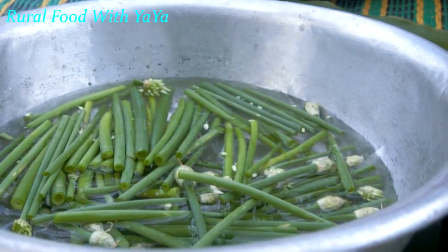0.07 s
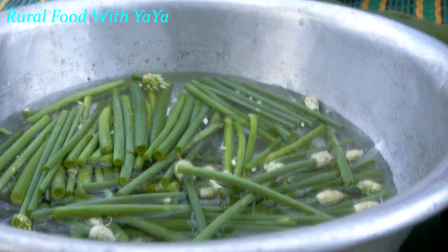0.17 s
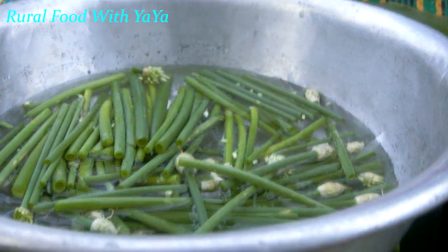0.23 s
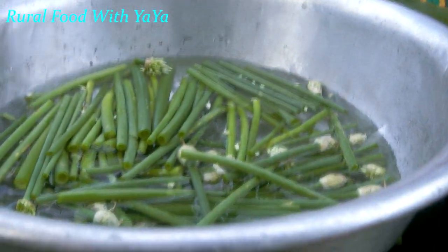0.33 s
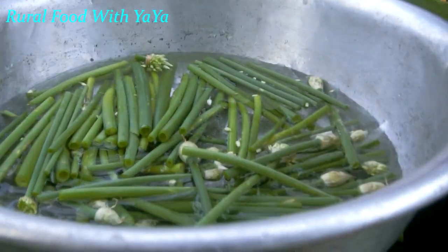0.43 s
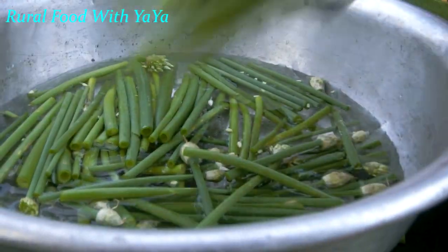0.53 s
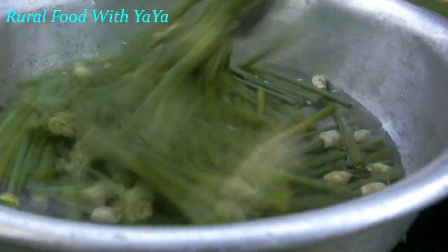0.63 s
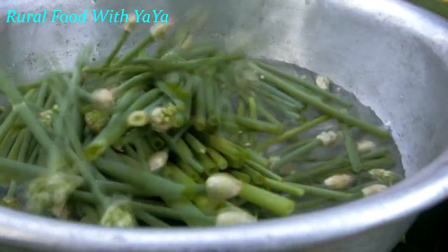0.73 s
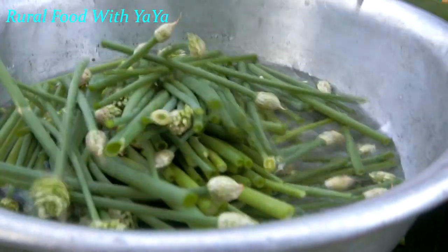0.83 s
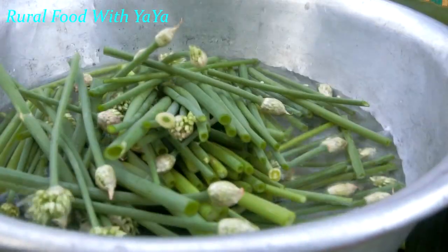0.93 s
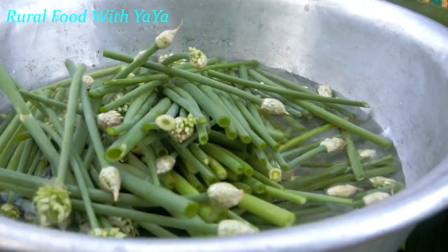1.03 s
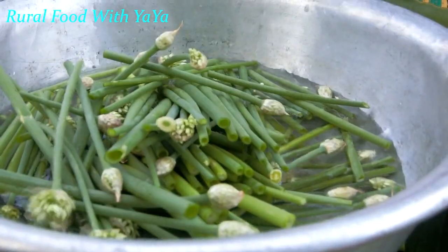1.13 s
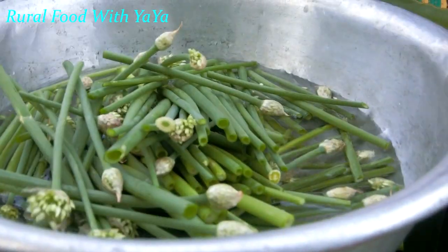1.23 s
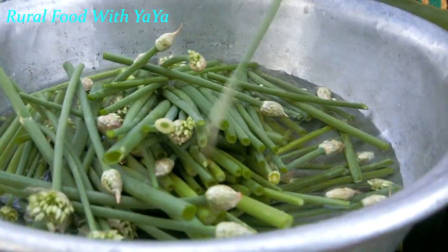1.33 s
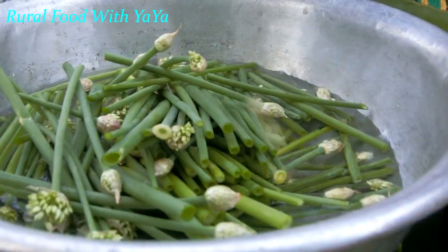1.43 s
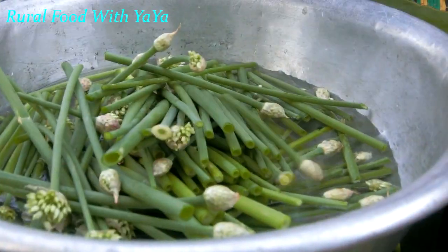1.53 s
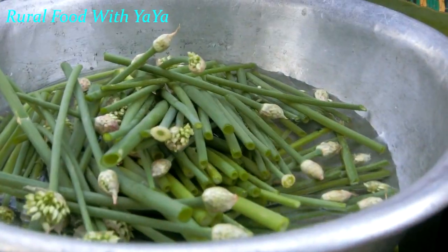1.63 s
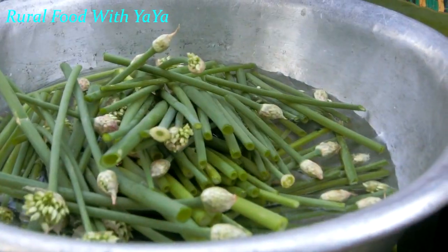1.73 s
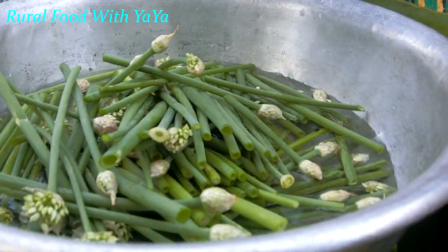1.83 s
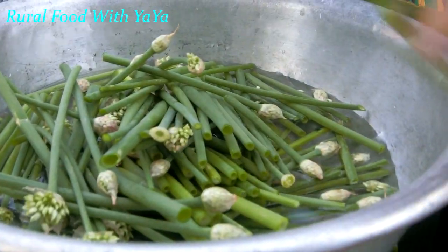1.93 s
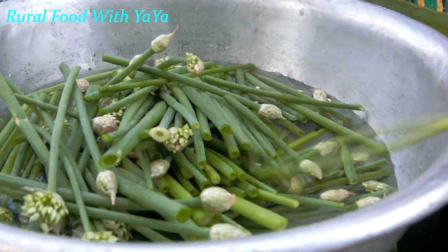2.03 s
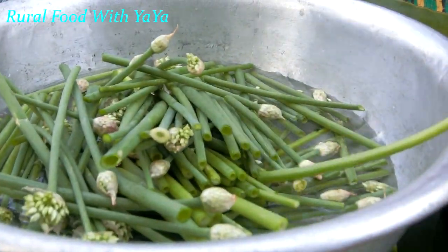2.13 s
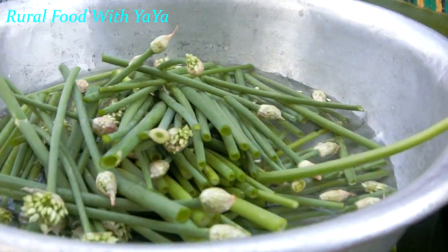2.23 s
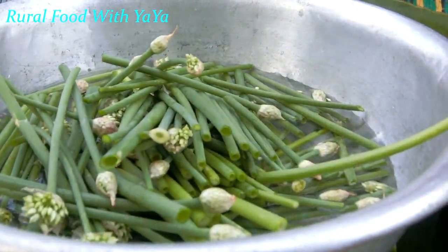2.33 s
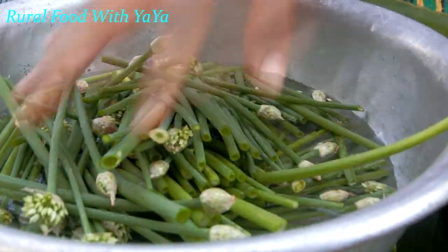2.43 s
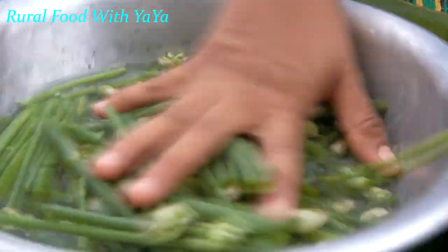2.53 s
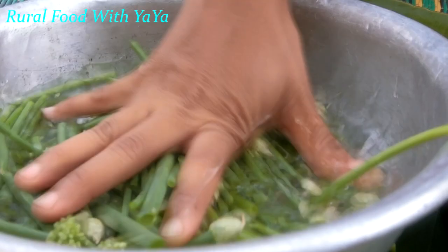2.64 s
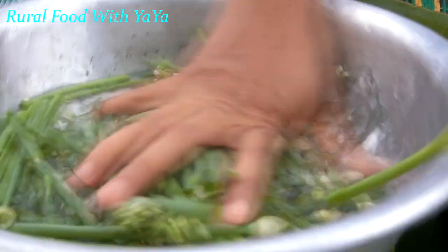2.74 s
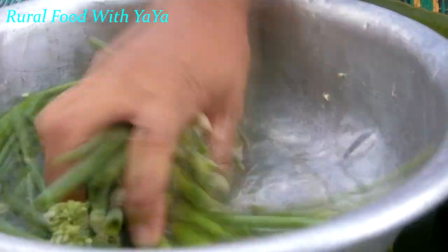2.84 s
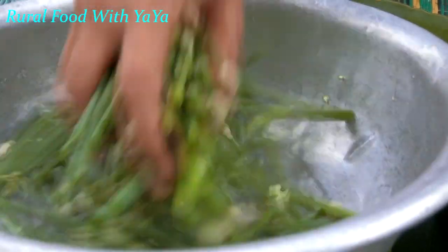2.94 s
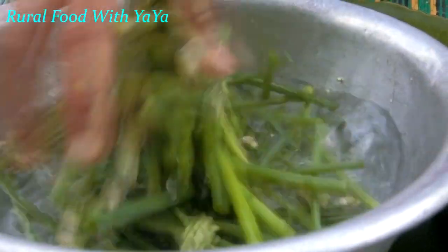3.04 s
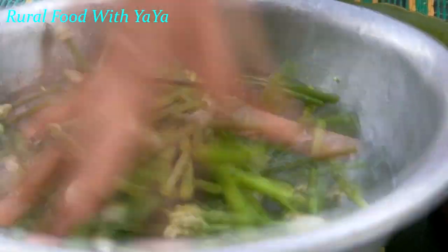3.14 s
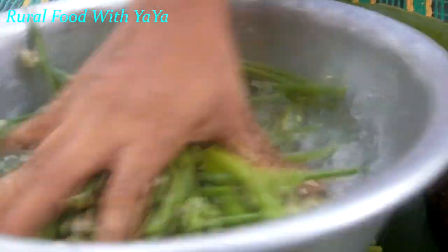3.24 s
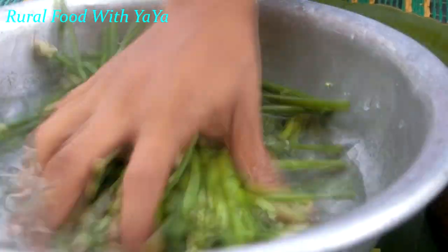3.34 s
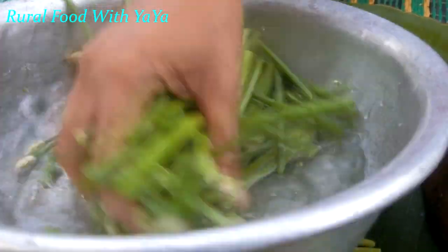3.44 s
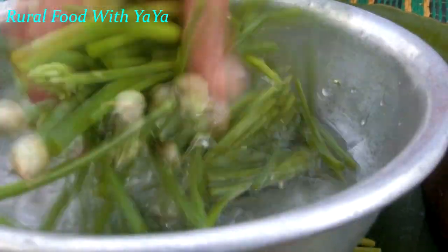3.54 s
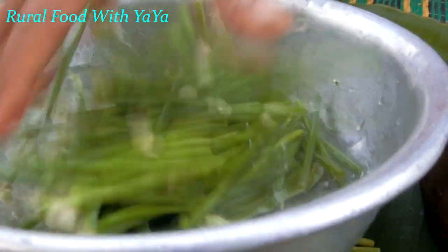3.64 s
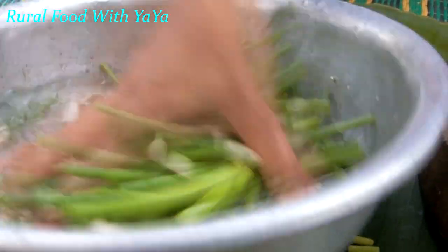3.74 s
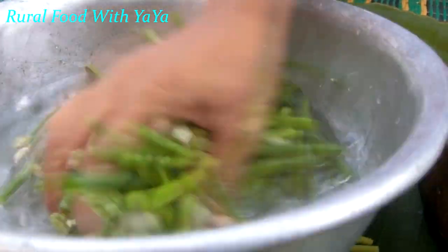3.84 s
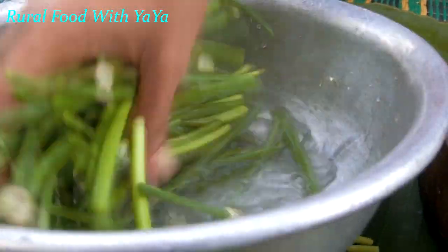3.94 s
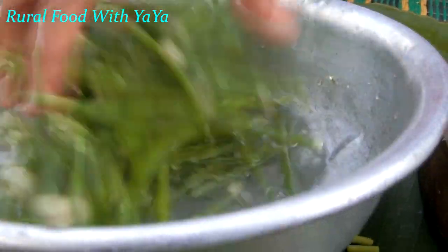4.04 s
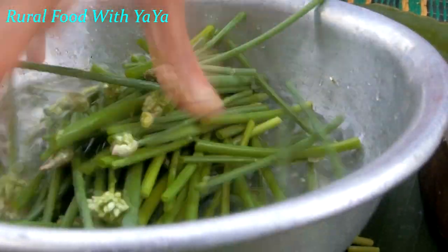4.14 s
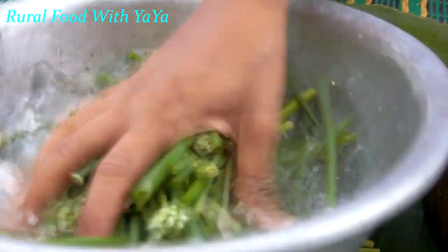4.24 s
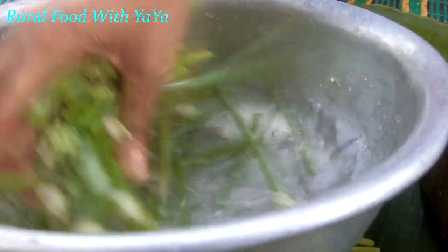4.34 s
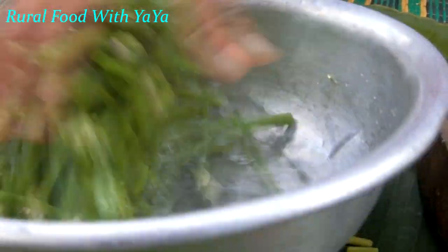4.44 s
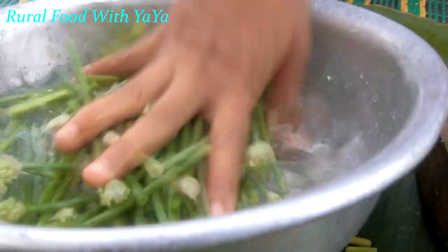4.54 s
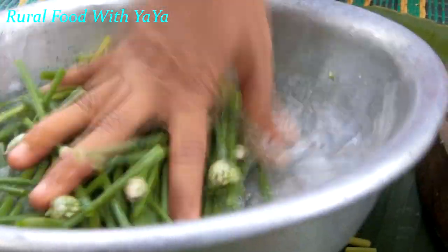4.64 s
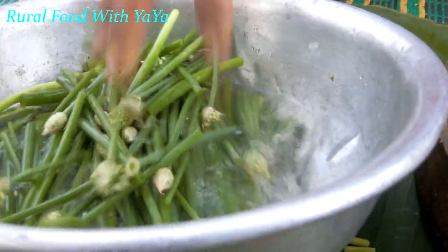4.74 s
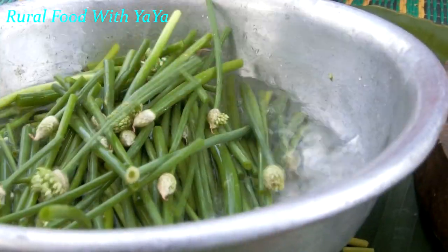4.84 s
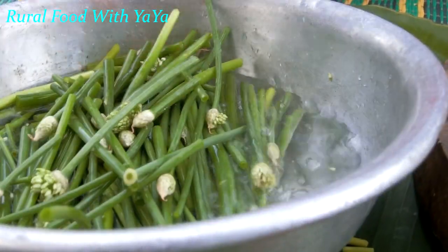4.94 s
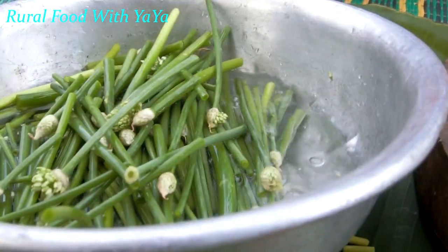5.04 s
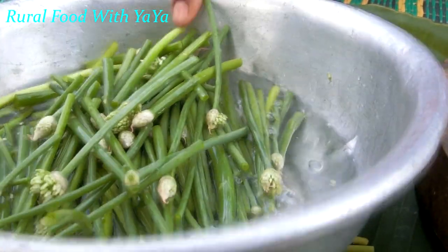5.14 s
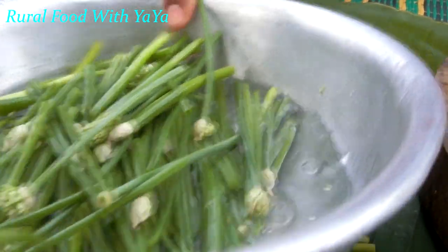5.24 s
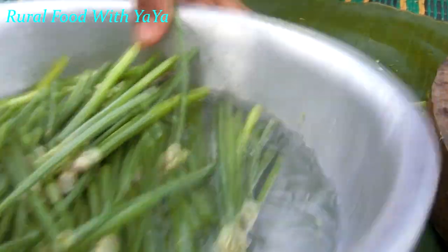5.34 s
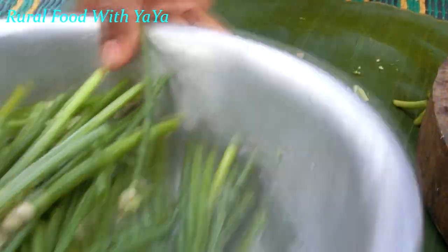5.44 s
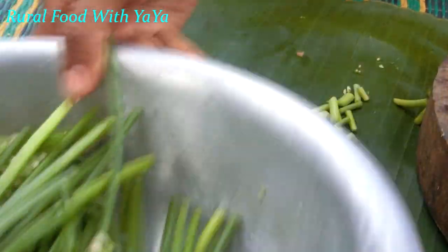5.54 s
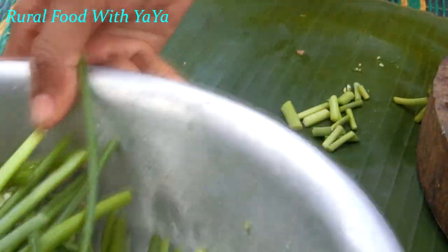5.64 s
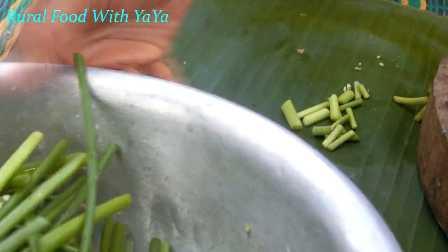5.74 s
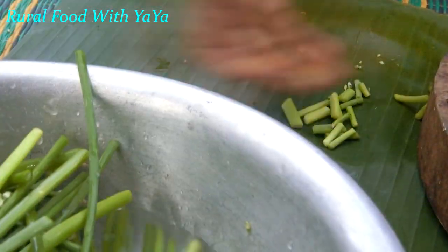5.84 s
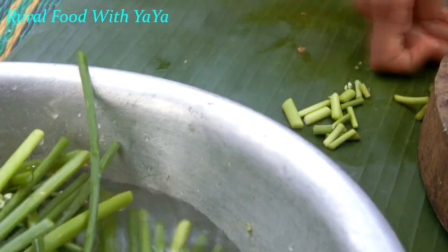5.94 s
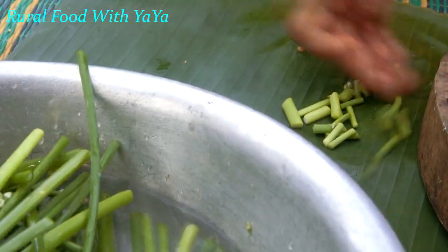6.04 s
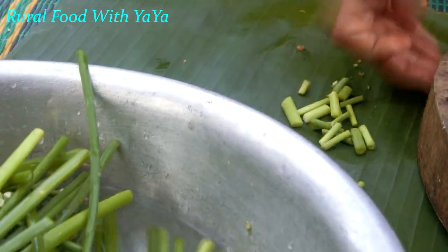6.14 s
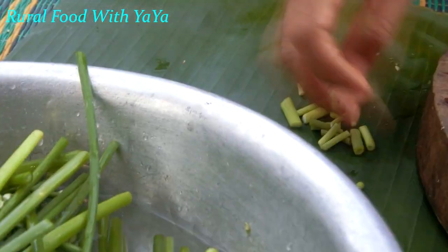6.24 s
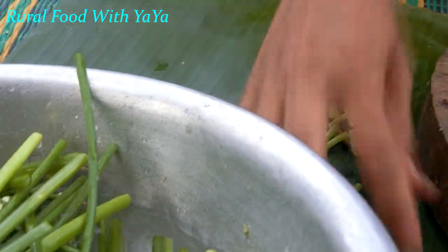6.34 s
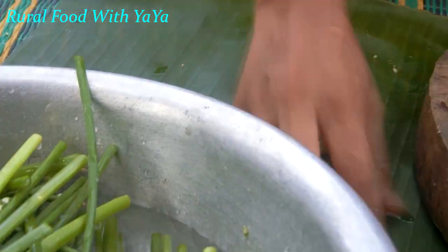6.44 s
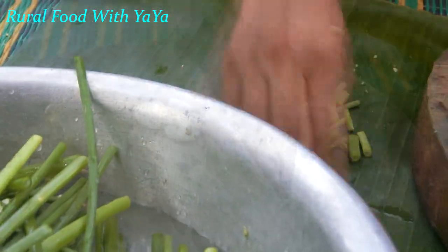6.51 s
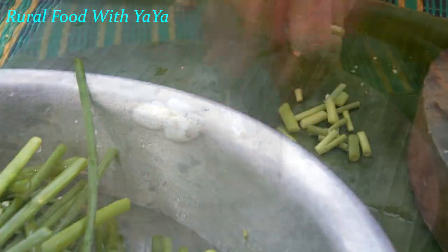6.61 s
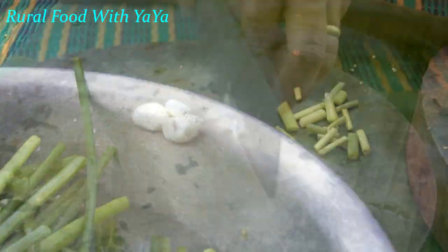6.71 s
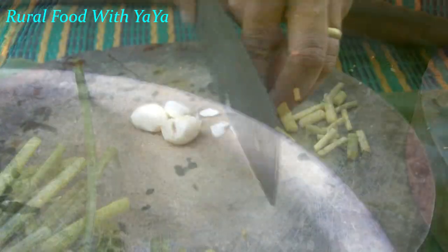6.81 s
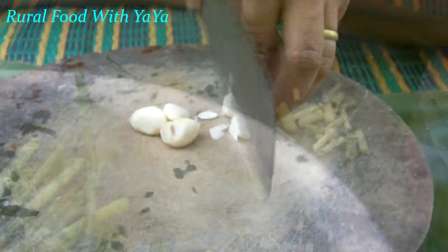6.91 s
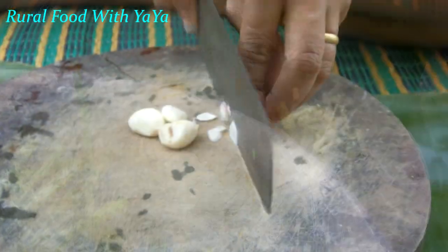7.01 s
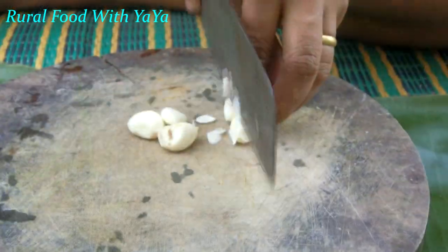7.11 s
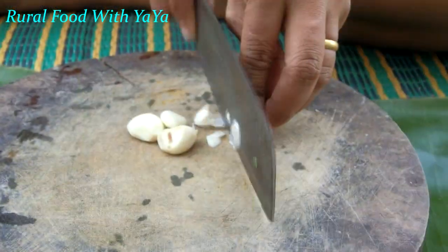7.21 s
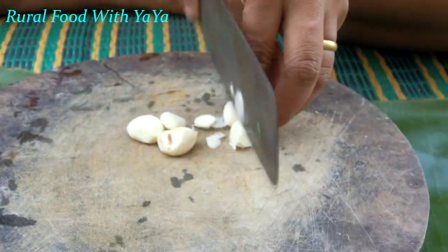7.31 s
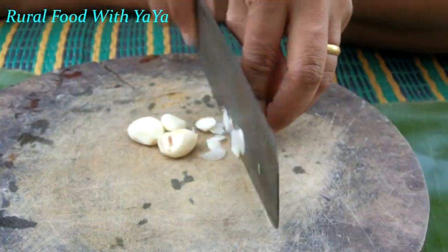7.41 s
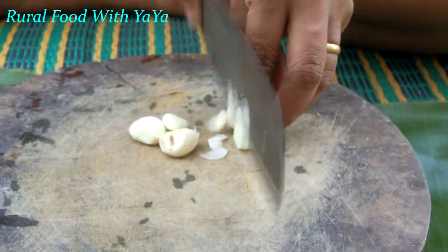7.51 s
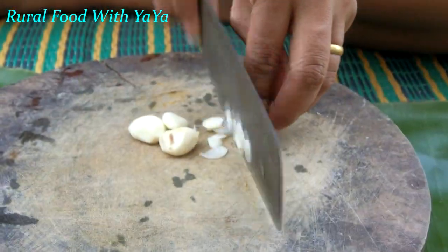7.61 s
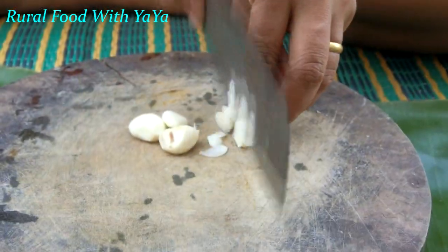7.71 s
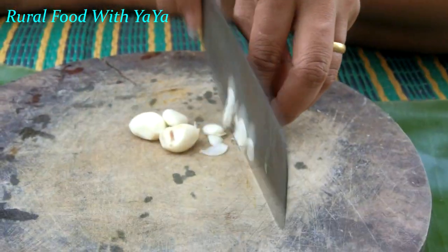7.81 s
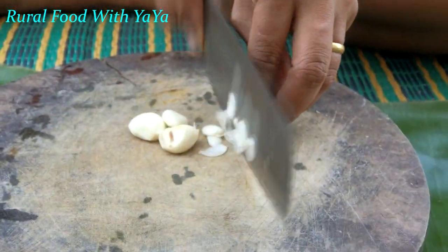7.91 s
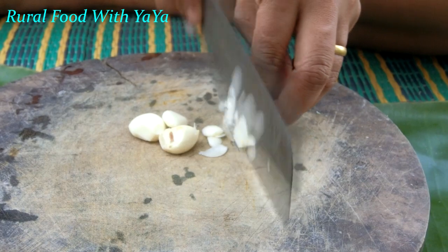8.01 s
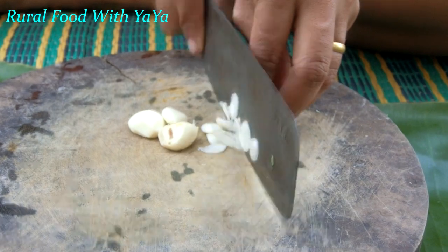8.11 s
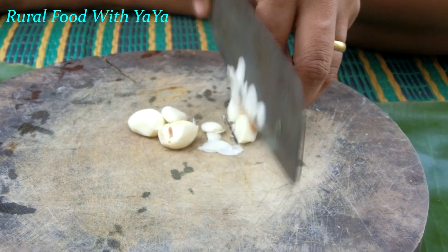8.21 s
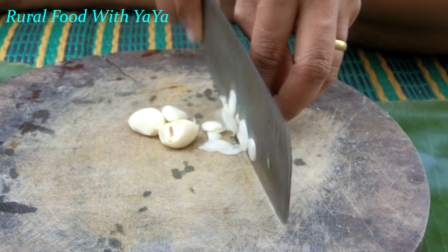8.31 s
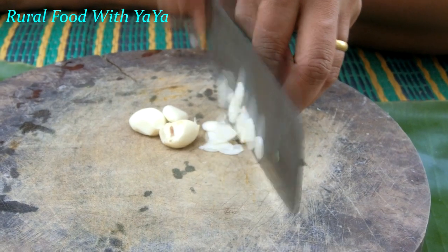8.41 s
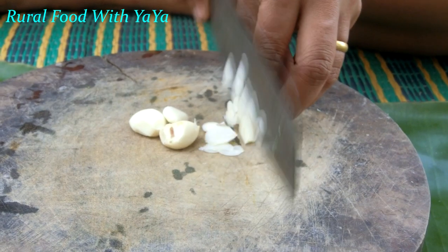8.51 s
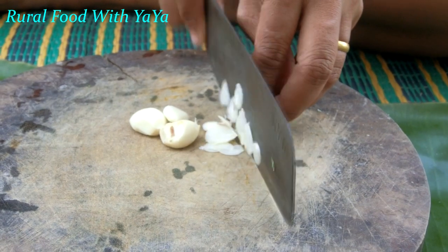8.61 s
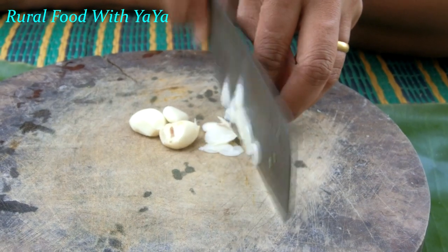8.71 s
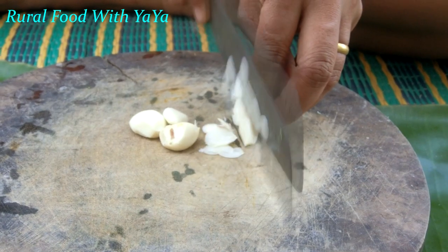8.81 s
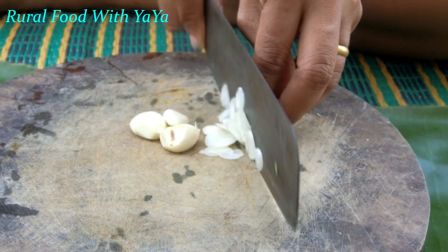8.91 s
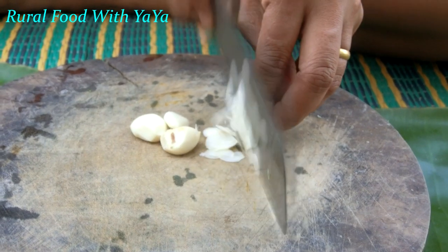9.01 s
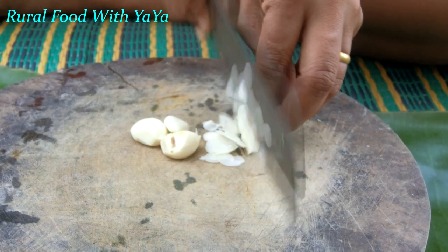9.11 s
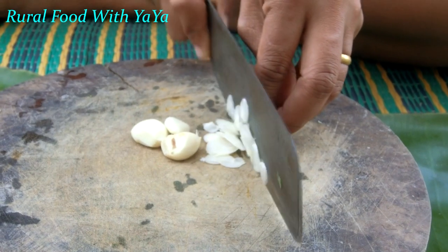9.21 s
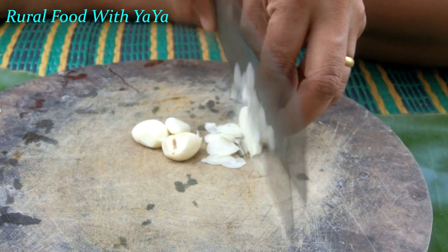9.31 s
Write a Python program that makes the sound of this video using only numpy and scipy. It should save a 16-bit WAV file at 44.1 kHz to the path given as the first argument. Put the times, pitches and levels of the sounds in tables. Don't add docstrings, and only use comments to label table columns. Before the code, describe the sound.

Wet stems swish and splash in a metal basin, a steel blade clatters, then a cleaver chops garlic briskly on a wooden block outdoors.

```python
import sys
import numpy as np
from scipy import signal
from scipy.fft import rfft, irfft, next_fast_len
from scipy.io import wavfile
from scipy.ndimage import uniform_filter1d

SR = 44100
rng = np.random.default_rng(int(sys.argv[2]) if len(sys.argv) > 2 else 0)


def to_linear_factor(level_db):
    exponent = np.asarray(level_db, float) / 20
    return 10 ** exponent


def wav_out(sig):
    wavfile.write(sys.argv[1], SR, np.round(np.clip(np.atleast_2d(sig).T, -1, 1) * 32767).astype(np.int16))


N = 412776

# (f/Hz, level/dB, 60 dB decay/s, face moving out or in +-1)
BLOCK_MODES = [(290, -16.5, 0.0071, -1), (496, -7.5, 0.019, 1), (587, -11.5, 0.039, 1),
               (850, -18, 0.018, -1), (983, -3, 0.025, 1), (1412, -12, 0.018, 1), (1660, -11, .017, 1),
               (1930, -14.5, 0.015, 1), (2256, -15.5, 0.023, 1), (2408, -4.5, 0.016, -1),
               (2714, -18, 0.012, 1), (3550, -19.5, .004, 1), (4760, -18.5, 0.0071, 1)]
# (t/s, heel/dB, tip/dB, hardness/dB, hollow boom/dB)
LANDINGS = [(2.3648, -16, -68, 5.5, 12), (2.3754, -20.5, -76, 4, -0.5), (6.5135, -26, -64, -2.5, 5),
            (6.7584, -15.5, -72, -0.5, 11.5), (6.973, -13, -81, -1.5, 4.5), (7.0527, -16.5, -32, 0.5, -9),
            (7.1794, -13, -11, 1, 2), (7.385, -12, -20.5, -3, -7), (7.574, -12, -67, -0.5, 6.5),
            (7.7714, -9.5, -18, 3.5, 11.5), (7.9536, -10.5, -16, 1.5, -1), (8.1355, -18.5, -17.5, -5, -15),
            (8.287, -16, -10, 4, 7), (8.452, -27.5, -10.5, 0, -9), (8.6073, -18.5, -8, 5, 9.5),
            (8.753, -10, -13.5, 2.5, -0.5), (8.914, -18, -67, -0.5, 7), (9.0706, -13.5, -73.5, 2, 8.5),
            (9.2244, -10.5, -74, -4, -8.5)]
DETUNE = .004
TIP_DELAY_S, TIP_HARDER_DB = .00786, 0.5

# (skin snap t/s, snap/dB, crunch/dB)
CLOVE_CUTS = [(6.495, -62, -59), (6.7363, -52, -48.5), (6.945, -34.5, -44.5), (7.163, -33.5, -41),
              (7.361, -36.5, -43), (7.554, -49, -47.5), (7.746, -47, -44.5), (7.755, -27, -60),
              (7.932, -67, -45.5), (8.107, -33, -41.5), (8.274, -57.5, -45), (8.435, -55, -61),
              (8.439, -31.5, -41.5), (8.5885, -33, -45.5), (8.7408, -39, -42.5), (8.898, -37.5, -47),
              (9.036, -64.5, -61), (9.052, -57, -50), (9.2048, -35, -44)]
# (t/s, end t/s, snap/dB, crunch/dB, juice/dB)
SLICES_SWEPT = [
    (7.053, 7.158, -30, -51, -40),
]
# (t/s, peak/dB)
BLADE_LIFTS = [
    (7.304, -36),
    (7.508, -44),
    (7.687, -40.5),
    (8.23, -36.5),
    (8.39, -40.5),
    (8.56, -45),
    (8.705, -41),
    (8.8039, -48.5),
]
# (f/Hz, level per Hz/dB)
FIBRE_COLOUR = [(88, -40.5), (150, -4.5), (730, 0.5), (979, -0.5), (3160, -7.5), (4410, 2.5), (8400, -3),
                (12200, 1.5), (14800, 3.5), (16200, -24)]
CRUSH_S, JUICE_DB = 0.0076, 2
LIFT_S = 0.028

# (f/Hz, level/dB)
BLADE_MODES = [(575, 0.5), (900, 2), (2455, -6), (2815, 6.5), (3205, 3), (3725, 1), (4450, 0.5), (6365, -3),
               (6868, 1.5), (8450, -4), (11250, -29), (12605, 0.5), (13250, -3), (14550, -4)]
# (t/s,
# strike/dB, liveliest f/Hz, rattle/s, tick/dB)
BLADE_SKIDS = [(0.04, -57, 3300, 0.1, -56), (0.23, -58, 3100, 0.006, -48), (2.321, -25, 2710, 0.019, 0.5),
               (2.33, -11, 1460, 0.03, 7), (2.333, -39, 8000, 0.012, 3),
               (2.3755, -20.5, 3900, 0.0024, -13.5), (2.406, -19, 12300, 0.0091, -6),
               (2.404, -31.5, 3100, 0.013, -6), (7.053, -31, 3800, 0.0012, -10),
               (7.14, -37, 7400, .008, -21), (2.385, -33, 1500, .035, -18), (2.322, -42.5, 330, .01, -16),
               (2.314, -52.5, 2300, 0.0091, -22.5), (2.413, -26, 12600, 0.0054, -21),
               (7.919, -51, 3800, 0.0015, -29)]
SKID_T60_S, SKID_PICK_DB = 0.014, 39
# (t/s, strike/dB, liveliest f/Hz, 60 dB decay/s, tick/dB)
BLADE_RINGS = [(2.3418, -25, 6830, 0.12, -7), (2.3425, -23, 12600, 0.07, -9), (2.334, -29, 12600, .05, -17),
               (2.322, -33.5, 900, 0.077, -29), (2.409, -39, 3800, 0.093, -52),
               (2.453, -50.5, 575, 0.23, -50.5), (6.873, -49.5, 12600, 0.14, -61),
               (2.343, -29.5, 3500, 0.1, -5.5), (2.366, -25, 575, 0.12, -38),
               (2.381, -19, 2340, 0.16, -35.5), (2.471, -55, 3200, 0.078, -34),
               (2.505, -51.5, 2380, 0.2, -47), (6.862, -60, 3050, 0.092, -30),
               (6.873, -43, 6220, 0.21, -62.5), (2.3653, -20, 3400, 0.029, 1),
               (7.927, -45, 3300, .015, -31.5)]
RING_RATTLE_S, RING_PICK_DB = 0.0015, 416.5

# (f/Hz, width/Hz, level/dB)
SINGING_TONES = [(1570, 62, -7.5), (2550, 230, -7.5), (2840, 50, -4), (3220, 48, -8), (3760, 23, -1.5),
                 (4500, 32, -13), (5290, 33, -14), (5820, 34, -11), (6390, 29, -0.5), (6880, 28, -4),
                 (7490, 70, -5), (8100, 36, -8), (9340, 67, -11), (12360, 200, -6.5), (13300, 57, -3),
                 (14600, 77, -1)]
# (t/s, level/dB, brightness/dB per octave)
SWEEP_PRESSURE = [
    (7.052, -60, 2),
    (7.058, -38, 2.5),
    (7.085, -38.5, 0),
    (7.11, -38, 1.5),
    (7.13, -39.5, 0),
    (7.146, -37, 3),
    (7.16, -43, -2),
    (7.19, -59.5, 0),
]
# (t/s, rustle/dB, rustle 60 dB decay/s, low puff/dB)
BLOCK_SETTLES = [(2.366, -68, .05, -49), (6.76, -38, 0.083, -57), (6.975, -34, 0.072, -65),
                 (7.055, -38, 0.085, -57), (7.188, -32, 0.067, -55), (7.393, -36.5, 0.042, -61),
                 (7.575, -46.5, 0.044, -58), (7.775, -42.5, 0.079, -52), (7.96, -32.5, 0.068, -58),
                 (8.143, -45.5, 0.091, -53), (8.296, -35.5, 0.059, -59), (8.46, -52, 0.036, -50),
                 (8.616, -30, 0.062, -53.5), (8.761, -50, 0.04, -57), (8.916, -34.5, 0.061, -59),
                 (9.072, -42.5, 0.048, -62), (9.226, -46, 0.03, -53.5)]

# (peak t/s, body/dB, rise/dB per s, fall/dB per s, wet fizz against body/dB)
HAND_SURGES = [(0.0, -69, 489, 62, 13), (0.642, -49, 1500, 96, -7), (0.706, -45, 137, 196, 1.5),
               (.755, -58, 400, 203, 3), (.8, -70.5, 200, 11, 5), (1.668, -58, 1494, 120, -26),
               (1.76, -79, 100, 28, -1), (2.16, -78, 59, 24, 12), (2.472, -58, 300, 111, -14),
               (2.598, -70.5, 289, 31, 10), (2.868, -61, 110, 82, 3.5), (3.175, -52, 250.5, 1500, 5.5),
               (3.216, -56.5, 105, 87, 2.5), (3.388, -60, 1000, 34, 4.5), (3.692, -49.5, 2000, 145, 2),
               (3.77, -50.5, 801, 120, 3), (3.93, -58, 62, 79, 5), (4.05, -70, 100, 200, 8),
               (4.119, -50, 243, 124, 0), (4.213, -51, 1989, 62, 0.5), (4.28, -48, 208, 900, 6),
               (4.375, -52.5, 105, 247.5, 6), (4.452, -61.5, 299, 400, 7), (4.525, -48.5, 206, 200, 2),
               (4.62, -46, 250, 300, 2), (4.665, -54, 200, 200, 2), (4.72, -62, 98, 51, 4.5),
               (5.15, -66, 26, 100, 0.5), (6.08, -68, 90, 133, 11.5), (6.178, -54.5, 78, 243, -26),
               (6.244, -53, 994, 143, -23), (6.12, -56, 102, 300, -20), (6.33, -72, 200, 198, -23),
               (6.46, -64, 900, 94, -20), (6.504, -56.5, 263, 33, -8), (6.655, -55.5, 100, 102, -25),
               (6.73, -62, 40, 600, -34), (7.855, -63, 300, 200, -20)]
LINGER = 1
# (f/Hz, level per Hz/dB)
BODY_COLOUR = [(180, -39), (300, -7.5), (776, 1), (1020, -3), (1200, 1), (1820, 3), (2030, 0),
               (3200, -17.5), (4160, -40.5), (7040, -120)]
# (f/Hz, level per Hz/dB)
FIZZ_COLOUR = [(1530, -32.5), (2600, -1), (3100, -5), (6470, -2), (8010, -5.5), (12700, -2.5), (14900, -4),
               (16000, -19.5)]

# (t/s, peak/dB, pitch f/Hz)
DRIPS = [(.636, -55, 785), (.652, -47, 895), (.697, -41, 1300), (1.412, -53, 800), (1.424, -47, 740),
         (1.44, -64, 726), (1.664, -48, 924), (1.684, -59.5, 910), (1.702, -53, 990), (1.718, -51, 797),
         (2.925, -52, 2940), (3.152, -44.5, 750), (3.197, -48.5, 1050), (3.232, -50, 2156),
         (3.408, -51, 820), (3.441, -41.5, 1660), (3.694, -41, 1690), (3.71, -39.5, 1250),
         (4.278, -45, 1160), (4.322, -36, 2027), (4.452, -44, 2250), (4.481, -46, 1490), (4.514, -44, 1710),
         (4.614, -40, 1360), (4.797, -49.5, 2220), (4.864, -53, 1454), (5.052, -49, 1520),
         (5.79, -50.5, 924), (5.98, -51, 540), (6.184, -48.5, 895), (6.241, -44.5, 1150), (6.267, -45, 624),
         (6.674, -52, 730), (7.84, -60, 1550), (7.857, -52.5, 696)]
# (t/s, peak/dB, colour f/Hz)
SPLASHES = [(0.551, -50, 7960), (.636, -52, 8780), (1.033, -55, 4360), (1.416, -57, 6000),
            (2.841, -49.5, 7210), (2.922, -52, 6410), (3.125, -46.5, 5020), (3.161, -41, 4600),
            (3.232, -45, 7300), (3.439, -46.5, 7540), (3.694, -45, 6600), (3.765, -37, 7200),
            (3.871, -45, 4930), (4.087, -49.5, 7760), (4.22, -42, 4620), (4.278, -46, 6510),
            (4.485, -45, 5200), (4.611, -37.5, 6900), (4.797, -58, 5070), (4.954, -49, 4530),
            (5.185, -50, 5730), (5.98, -60, 7780), (6.239, -65, 5970)]
# (t/s, level/dB)
BASIN_KNOCKS = [
    (2.008, -46.5),
    (2.052, -57),
    (2.089, -57),
    (2.125, -71),
    (3.719, -43),
    (5.79, -59),
]
# (f/Hz, level/dB, 60 dB decay/s)
BASIN_MODES = [(503, -3.5, 0.14), (624, -2.5, 0.22), (905, -7, 0.16), (1107, -0.5, 0.14), (1156, -3, 0.073),
               (1690, -16, .1), (1930, -21, .07)]
# (t/s, peak/dB, colour f/Hz)
SNAPS = [(2.9672, -49, 11600), (3.1053, -36.5, 4680), (3.163, -32, 4470), (3.693, -27.5, 6630),
         (3.7017, -31, 6630), (3.7134, -35, 6890), (3.782, -26, 11100), (3.8122, -39, 4430),
         (3.85, -34, 8030), (3.8726, -44, 4830), (3.9374, -40, 5100), (4.0253, -45, 4670),
         (4.0397, -40, 5180), (4.0554, -40, 9260), (4.2098, -37, 6340), (4.226, -35.5, 4840),
         (4.2834, -33, 6520), (4.4928, -30, 6660), (4.5014, -25, 9050), (4.5124, -29, 6460),
         (4.5955, -36, 6010), (4.6099, -25, 6700), (4.6204, -25, 6020), (4.65, -30, 3820),
         (5.1876, -35, 4920), (5.2204, -42, 3190), (5.7463, -42, 7930), (5.7872, -40, 3330),
         (5.9834, -41, 7750), (6.1754, -54, 3010), (6.2407, -35.5, 5970), (6.5544, -46, 7500)]

# (t/s, level/dB, scrape f/Hz, hum against scrape/dB)
BASIN_SLIDE = [
    (5.15, -80, 2770, 8),
    (5.196, -57, 2710, -0.5),
    (5.486, -47.5, 2976, -0.5),
    (5.55, -47.5, 3070, 0),
    (5.645, -52.5, 3100, 5),
    (5.66, -54, 3080, -4.5),
    (5.715, -60, 3120, -0.5),
    (5.78, -78, 3087, -3.5),
]
# (ratio to scrape pitch, width/Hz, level/dB)
SCRAPE_TONES = [(.75, 90, 1), (.86, 90, 2.5), (1, 220, 9), (1.08, 60, -3), (1.17, 90, -10), (1.6, 200, -6),
                (1.75, 80, -18)]

# (f/Hz, level per Hz/dB)
AIR_COLOUR = [(53, -31.5), (90, -5), (560, -5), (743, -2.5), (1050, -7.5), (1340, -7), (1460, -8),
              (2250, -7.5), (4940, -13), (13500, -11), (14900, -18.5), (16000, -55)]
# (t/s, level/dB)
AIR_OVER_TIME = [(0, -60.5), (.15, -62.5), (.4, -63.5), (2.35, -58), (2.45, -61), (2.54, -98),
                 (2.57, -71.5), (6.6, -59), (7.2, -65), (9.36, -67.5)]
# (f/Hz, likeness)
AIR_LIKENESS = [(60, 0.15), (180, 0.14), (550, 0.57), (1650, 0.4), (4970, 0.056), (15000, 0.064)]

# (f/Hz, scattered side against mid/dB)
SIDE_WIDTH = [(100, -30), (400, -41), (1000, -15.5), (2300, -10), (4500, -6), (9000, 1.5), (15000, -3)]
# (f/Hz, left over right/dB)
LEFT_LEAN = [(200, .3), (1000, 1.5), (2200, .8), (5000, 4), (12000, 2.5)]
# (f/Hz, level/dB)
MIC_RESPONSE = [(40, -3), (8000, -1), (14000, -4.5), (15200, -11), (16300, -48)]


def evened(x):
    return x / np.sqrt(np.mean(x ** 2) + 1e-20)


def read(points, hz):
    f, value = np.transpose(points)
    return np.interp(np.log(hz + 1), np.log(f + 1), value)


def add(mix, s, sound):
    part = mix[round(s * SR):][:len(sound)]
    part += sound[:len(part)]


def colour(x, points):
    size = next_fast_len(x.shape[-1])
    gain = to_linear_factor(read(points, np.fft.rfftfreq(size, 1 / SR)))
    return irfft(rfft(x, size) * gain, size)[..., :x.shape[-1]]


def ring(hz, db, t60, length):
    t = np.arange(round(length * SR))[:, None] / SR
    return (to_linear_factor(db - 60 * t / t60) * np.sin(2 * np.pi * hz * t)).sum(1)


def singing(rub, turn, width_hz):
    r = np.exp(-np.pi * width_hz / SR)
    return evened((turn * signal.lfilter([1 - r], [1, -r], rub / turn)).real)


def gritty(size_db, grain):
    jumps = np.minimum(rng.exponential(1, N // grain + 1), 4)
    jumps = np.repeat(jumps, grain)[:N]
    return evened(rng.standard_normal(N) * to_linear_factor(size_db * uniform_filter1d(jumps, grain)))


def patchy(x, patch_db):
    z = signal.stft(x, nperseg=256)[2]
    patches = rng.standard_normal(z.shape[::-1]).T
    patches = uniform_filter1d(uniform_filter1d(patches, size=14, axis=0), size=4, axis=1)
    return signal.istft(z * to_linear_factor(patch_db * evened(patches)), nperseg=256)[1][:N]


def block():
    hz, level_db, t60, sign = np.transpose(BLOCK_MODES)
    contact_s, t = .0009, np.arange(SR // 16)[:, None] / SR
    blows = [(s, db, hard, boom) for s, db, _, hard, boom in LANDINGS]
    blows += [(s + TIP_DELAY_S, db, hard + TIP_HARDER_DB, boom) for s, _, db, hard, boom in LANDINGS]
    out, place = np.zeros(N), rng.standard_normal((len(blows), 2, len(hz)))
    thuds = rng.standard_normal((len(blows), len(t)))
    thuds = evened(colour(thuds, [(200, -29.0), (450, 6.0), (2500, -0.5), (3200, -11.0), (7000, -23.5)]))
    push = np.sin(np.pi / 2 * np.minimum(t[:, 0] / contact_s, 1)) ** 2
    for (s, db, hard_db, boom_db), (detune, spot), thud in zip(blows, place, thuds):
        tilt_db = hard_db * np.log2(hz / 1000) + boom_db * (abs(hz - 600) < 80) + 1.1 * spot
        fade = to_linear_factor(level_db + tilt_db - 60 * np.maximum(t - contact_s, 0) / t60)
        wave = np.cos(2 * np.pi * hz * (1 + DETUNE * detune) * (t - contact_s))
        modes = (np.sign(sign) * fade * wave).sum(1)
        sound = modes / abs(modes).max() + to_linear_factor(-14.0 - 60 * t[:, 0] / 0.024) * thud
        add(out, s, to_linear_factor(db) * sound * push)
    return signal.lfilter(*signal.butter(2, 260, 'high', fs=SR), out)


def garlic():
    high, low, snap, t = np.zeros(N), np.zeros(N), np.zeros(N), np.arange(SR // 4) / SR
    landings = np.transpose(LANDINGS)[0]
    cuts = [(s, landings[landings > s][0] + CRUSH_S, *dbs, JUICE_DB) for s, *dbs in CLOVE_CUTS]
    for s, end, snap_db, crunch_db, low_db in cuts + SLICES_SWEPT:
        tear = to_linear_factor(crunch_db - 60 * np.maximum(t - (end - s), 0) / 0.022) * np.minimum(t / 0.0041, 1)
        add(snap, s, to_linear_factor(snap_db - 60 * t / 0.013))
        add(high, s, tear)
        swell = np.clip(t / (end - s), .3, 1)
        add(low, s, to_linear_factor(low_db) * tear * swell)
    for s, db in BLADE_LIFTS:
        add(high, s, to_linear_factor(db - 21.5) * np.hanning(round(LIFT_S * SR)))
    juice = colour(gritty(3.4, grain=40), [(200, -21.5), (600, -1.0), (1500, -6.5), (2800, -12.5), (5000, -20.5)])
    fibres = patchy(colour(gritty(5.0, grain=12), FIBRE_COLOUR), 1.4)
    skin = colour(rng.standard_normal(N), [(300, -38.5), (1500, -10.5), (5000, -4.5), (15000, -6.0)])
    return high * evened(fibres) + low * evened(juice) + snap * evened(skin)


def blade():
    out, t = np.zeros(N), np.arange(SR // 5) / SR
    hz, level_db = np.transpose(BLADE_MODES)[:, :, None]
    touches = [(s, db, f, length, SKID_T60_S + 0.25 * length, tick, SKID_PICK_DB)
               for s, db, f, length, tick in BLADE_SKIDS]
    touches += [(s, db, f, RING_RATTLE_S, t60, tick, RING_PICK_DB) for s, db, f, t60, tick in BLADE_RINGS]
    for s, db, centre_hz, length, t60, tick_db, pick_db in touches:
        contacts = rng.standard_normal(len(t)) * rng.exponential(1, len(t)) * np.exp(-t / length)
        contacts = contacts[:round(min(3 * length, .125) * SR)]
        contacts = contacts / np.linalg.norm(contacts)
        modes = to_linear_factor(-60 * t / t60) * np.sin(2 * np.pi * hz * t)
        driven = signal.fftconvolve(contacts[None], modes, axes=1)
        share = np.linalg.norm(modes, axis=1) / np.linalg.norm(driven, axis=1)
        driven *= share[:, None]
        mode_db = db + level_db - pick_db * np.log2(hz / centre_hz) ** 2
        add(out, s, (to_linear_factor(mode_db) * driven).sum(0))
        tick = colour(contacts, [(centre_hz / 6, -22), (centre_hz, 0), (centre_hz * 3, -9)])
        add(out, s, to_linear_factor(tick_db) * tick)
    return signal.lfilter(*signal.butter(4, 430, 'high', fs=SR), out)


def sweep():
    s, db, bright_db = np.transpose(SWEEP_PRESSURE)
    t, out, mix = np.arange(s[0], s[-1], 1 / SR), 0, np.zeros(N)
    rubs = rng.standard_normal((len(SINGING_TONES), len(t)))
    for (hz, width_hz, peak_db), rub in zip(SINGING_TONES, rubs):
        line = singing(rub, np.exp(2j * np.pi * hz * t), width_hz) * np.sqrt(width_hz / 40)
        out = out + to_linear_factor(peak_db + np.interp(t, s, bright_db) * np.log2(hz / 5000)) * line
    add(mix, s[0], to_linear_factor(np.interp(t, s, db)) * evened(out))
    return mix


def settling():
    out, t = np.zeros(N), np.arange(SR // 6) / SR
    rustles = rng.standard_normal((len(BLOCK_SETTLES), len(t)))
    rustles = evened(colour(rustles, [(250, -19.5), (550, 3.5), (1100, -4.5), (2400, -2), (3300, -12.5),
                                      (6000, -22.5)]))
    for (s, db, t60, puff_db), rustle in zip(BLOCK_SETTLES, rustles):
        add(out, s, to_linear_factor(db - 60 * t / t60) * np.minimum(t / 0.0023, 1) * rustle)
        add(out, s, to_linear_factor(puff_db) * np.sin(2 * np.pi * 170 * t) * t / .004 * np.exp(1 - t / .004))
    return out


def handling():
    rumble = evened(colour(rng.standard_normal(N), [(60, -44), (150, 7.5), (300, 4.5), (420, -23.0)]))
    body = evened(colour(gritty(1.8, grain=90), BODY_COLOUR)) + to_linear_factor(-18.0) * rumble
    wet = evened(colour(gritty(1.3, grain=50), FIZZ_COLOUR)) + to_linear_factor(-20.5) * bubbles(N)
    dull = evened(colour(body, [(300, -5.5), (1100, -3.0), (1800, -28), (4000, -24)]))
    t = np.arange(0, N, 32) / SR
    s, body_db, rise, fall, wet_db = np.transpose(HAND_SURGES)[:, :, None]
    below_db = np.maximum(rise * (s - t), fall * (t - s))

    def total(db):
        return np.interp(np.arange(N) / SR, t, np.linalg.norm(to_linear_factor(db), axis=0))

    level = total(body_db - below_db)
    fizz = total(body_db + wet_db - LINGER * below_db)
    bright = np.clip(0.74 * fizz / (level + 1e-12), 0, 1)
    rubbing = level * (bright * body + (1 - bright) * dull)
    return patchy(rubbing, 2.2) + patchy(fizz * wet, 2.2)


def bubbles(size):
    t, out = np.arange(500) / SR, np.zeros(size)
    starts = rng.random(size) < 300 / SR
    drops = to_linear_factor(9.0 * np.minimum(rng.exponential(1, size), 3)) * starts
    kind = rng.integers(0, 8, size)
    for k, hz in enumerate(np.geomspace(600, 5500, num=8)):
        drop = np.sin(2 * np.pi * hz * t * (1 + 12 * t)) * np.exp(-t * hz / 9) * np.minimum(t / 0.00024, 1)
        out += signal.oaconvolve(drops * (kind == k), drop)[:size]
    return evened(out)


def taps():
    out, t = np.zeros(N), np.arange(SR // 8) / SR
    for s, db, hz in DRIPS:
        rough = evened(colour(rng.standard_normal(len(t)), [(hz * .6, -25), (hz, 0), (hz * 1.6, -20)]))
        plop = np.sin(2 * np.pi * hz * t) + .6 * rough
        add(out, s, to_linear_factor(db - 60 * t / 0.058) * np.minimum(t / 0.00078, 1) * plop)
    for s, db, hz in SPLASHES:
        spray = colour(rng.standard_normal(len(t)),
                       [(1500, -25), (hz * 0.74, -9), (hz, 0), (hz * 1.08, -6), (15000, -12)])
        add(out, s, to_linear_factor(db + 1.5 - 60 * t / 0.087) * np.minimum(t / 0.0031, 1) * evened(spray))
    basin = ring(*np.transpose(BASIN_MODES), .3)
    for s, db in BASIN_KNOCKS:
        knock = to_linear_factor(-60 * t / 0.1) * rng.standard_normal(len(t))
        add(out, s, to_linear_factor(db) * signal.fftconvolve(knock / np.linalg.norm(knock), basin))
        add(out, s, to_linear_factor(db + 4.0) * colour(knock, [(250, -42), (500, -1), (2000, -1.5), (8000, -9.5)]))
    return out


def ticks():
    out, t = np.zeros(N), np.arange(SR // 50) / SR
    for s, db, hz in SNAPS:
        click = colour(rng.standard_normal(len(t)),
                       [(hz / 5, -20), (hz * 0.59, -3), (hz, 0), (hz * 0.95, -4), (15500, -8)])
        click = click * to_linear_factor(-60 * t / 0.016)
        add(out, s, to_linear_factor(db - 3.0) * click / abs(click).max())
    return out


def drag():
    s, db, hz, hum_db = np.transpose(BASIN_SLIDE)
    t = np.arange(s[0], s[-1], 1 / SR)
    rub, scrape = gritty(1.0, grain=60)[:len(t)], 0
    for ratio, width_hz, peak_db in SCRAPE_TONES:
        turn = np.exp(2j * np.pi * np.cumsum(ratio * np.interp(t, s, hz)) / SR)
        scrape = scrape + to_linear_factor(peak_db) * singing(rub, turn, width_hz)
    hum = evened(colour(rub, [(300, -26.0), (520, -6), (770, 1.5), (1050, -4.5), (1400, -5), (2500, -24.0)]))
    hiss = evened(colour(rub, FIZZ_COLOUR))
    whole = evened(scrape) + to_linear_factor(np.interp(t, s, hum_db)) * hum + to_linear_factor(-5.0) * hiss
    mix = np.zeros(N)
    add(mix, s[0], to_linear_factor(np.interp(t, s, db) - 1.5) * whole * signal.windows.tukey(len(t), .1))
    return mix


def air():
    frames, hz = N // 256 + 5, np.fft.rfftfreq(1024, 1 / SR)
    a, b, c, d, patches = rng.standard_normal((frames, 513, 5)).T
    patches = evened(uniform_filter1d(uniform_filter1d(patches, 14, 0), 14, 1))
    same = np.clip(read(AIR_LIKENESS, hz), -1, 1)[:, None]
    left = a + 1j * b
    right = same * left + np.sqrt(1 - same ** 2) * (c + 1j * d)
    z = np.array([left, right]) * to_linear_factor(read(AIR_COLOUR, hz)[:, None] + 1.65 * patches)
    level_db = np.interp(np.arange(N) / SR, *np.transpose(AIR_OVER_TIME))
    level = to_linear_factor(level_db + np.array([[1.2], [-1.2]]))
    return level * evened(signal.istft(z, nperseg=1024, noverlap=768)[1][:, :N])


def breeze():
    wind = colour(rng.standard_normal((2, N)), [(8, -18.5), (22, 2), (40, -14.0), (90, -16.0), (200, -47.5)])
    return to_linear_factor(-71.0) * evened(wind)


def ports(x, side_db):
    z = signal.stft(x, nperseg=64)[2]
    wander = uniform_filter1d(rng.standard_normal(z.shape[::-1]).T, 30, 1)
    scattered = signal.istft(z * np.exp(2.5j * evened(wander)), nperseg=64)[1][:N]
    side = to_linear_factor(side_db) * colour(scattered, SIDE_WIDTH)
    half = [(hz, db / 2) for hz, db in LEFT_LEAN]
    return np.array([colour(x + side, half), colour(x - side, [(hz, -db) for hz, db in half])])


def scene():
    near = block() + garlic() + settling() + handling() + taps() + ticks() + drag()
    steel = blade() + sweep()
    return ports(near, side_db=1.0) + ports(steel, side_db=5.5) + air() + breeze()


def top_cut(x):
    return signal.sosfilt(signal.butter(12, 16490, fs=SR, output="sos"), x)


def record(dry):
    mix = colour(dry, MIC_RESPONSE)
    return top_cut(mix)


dry = scene()
out = record(dry)
wav_out(out)
```